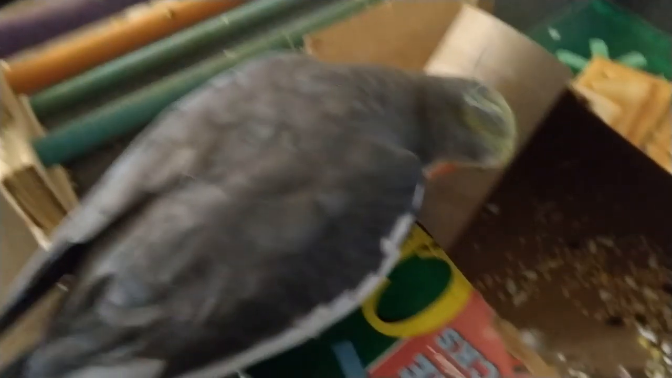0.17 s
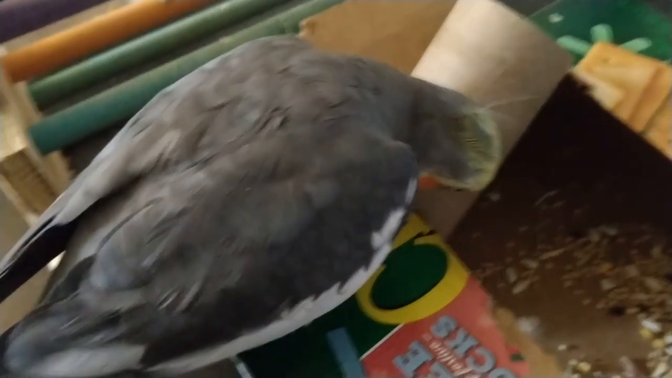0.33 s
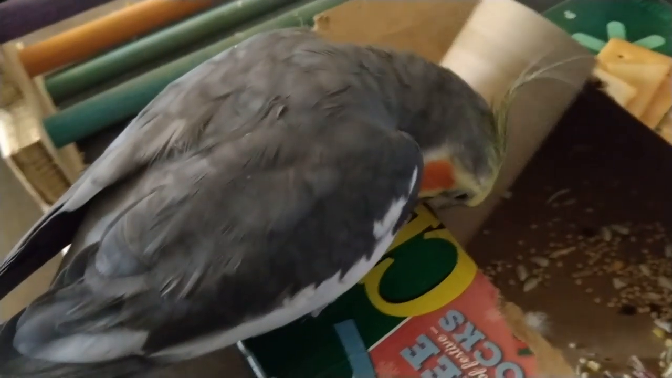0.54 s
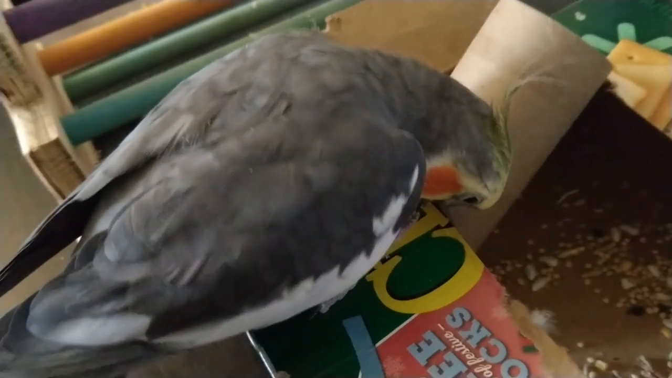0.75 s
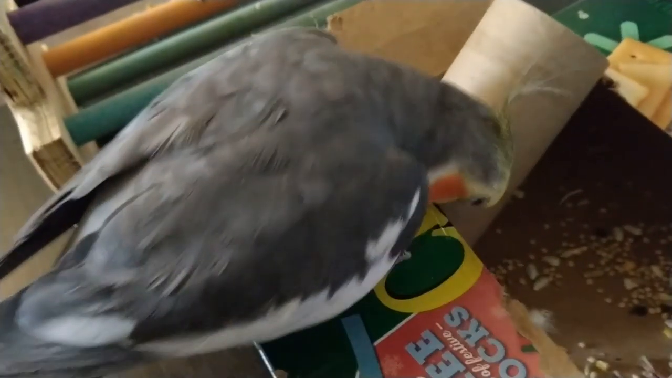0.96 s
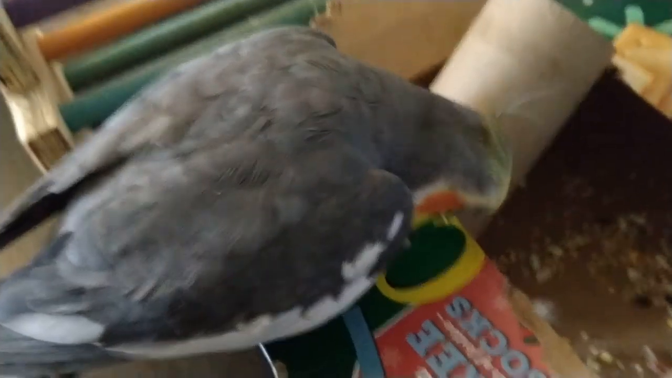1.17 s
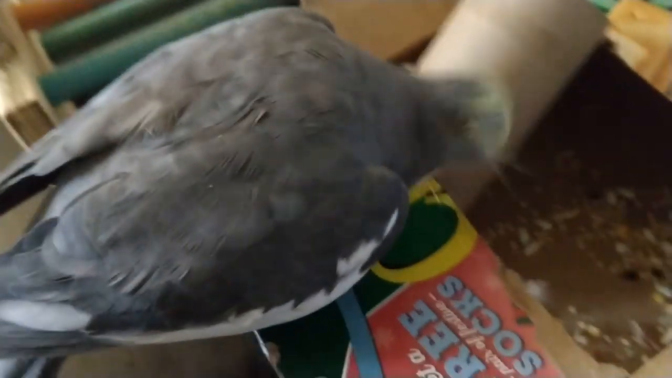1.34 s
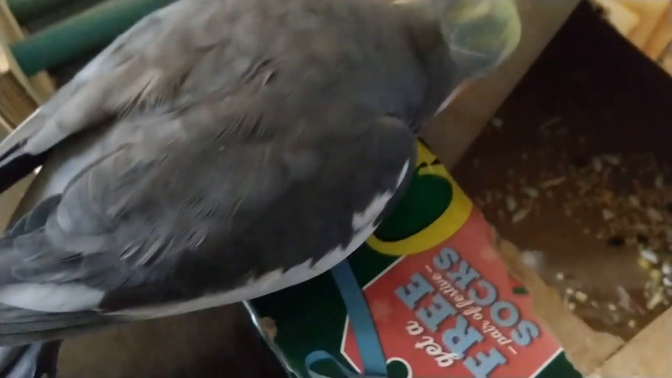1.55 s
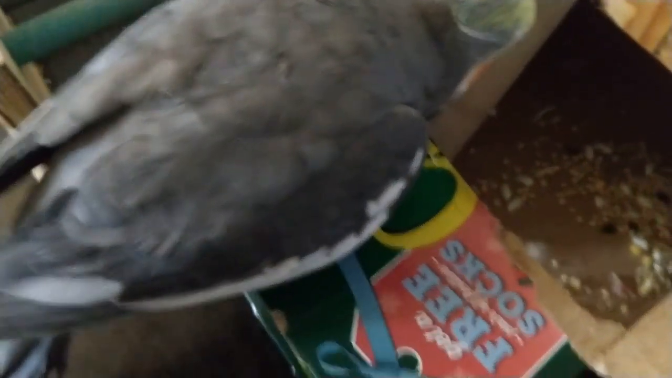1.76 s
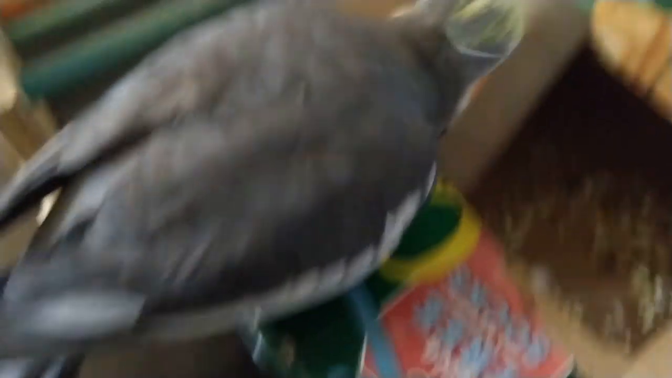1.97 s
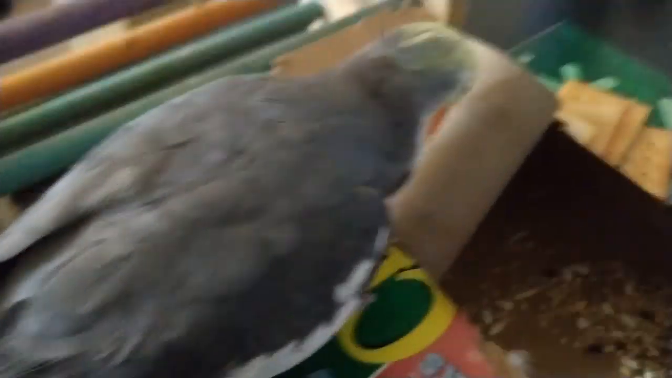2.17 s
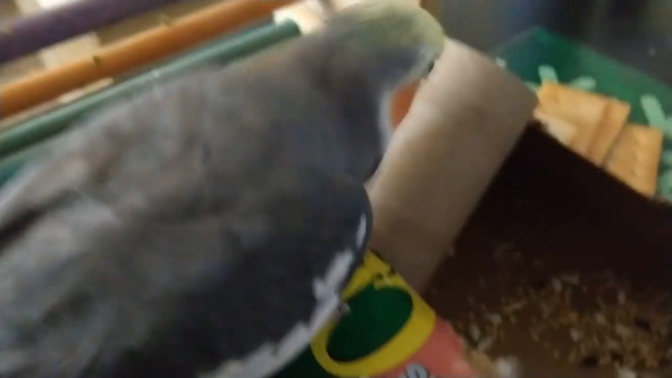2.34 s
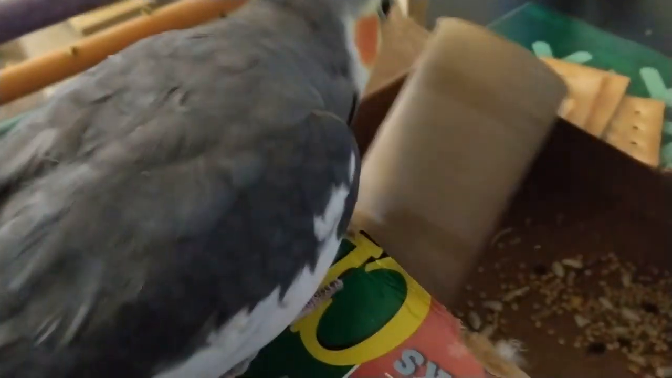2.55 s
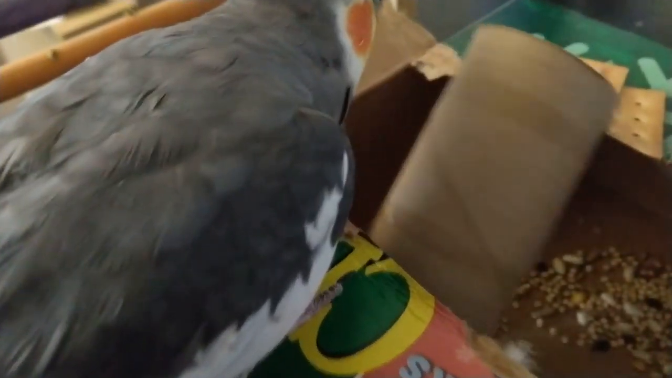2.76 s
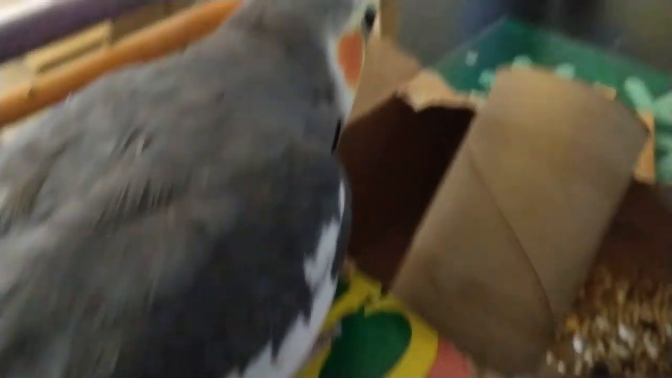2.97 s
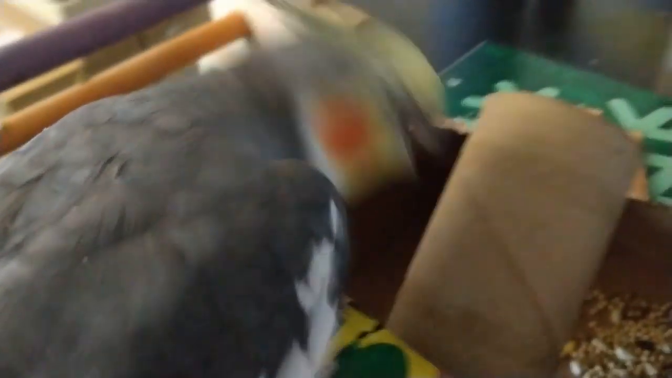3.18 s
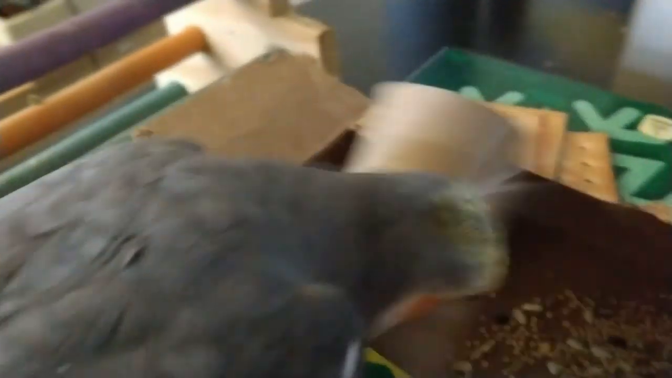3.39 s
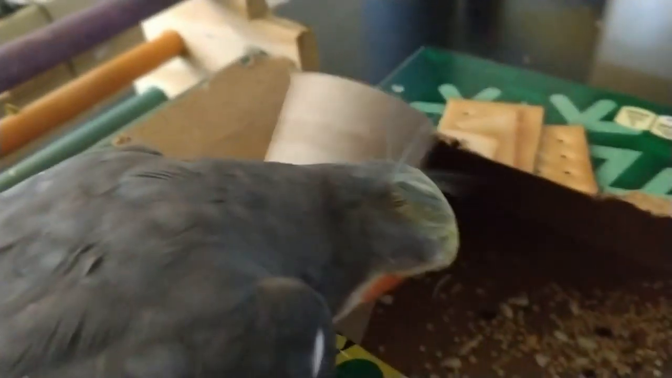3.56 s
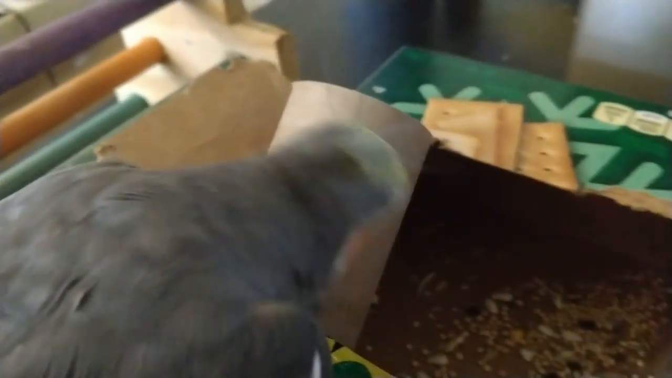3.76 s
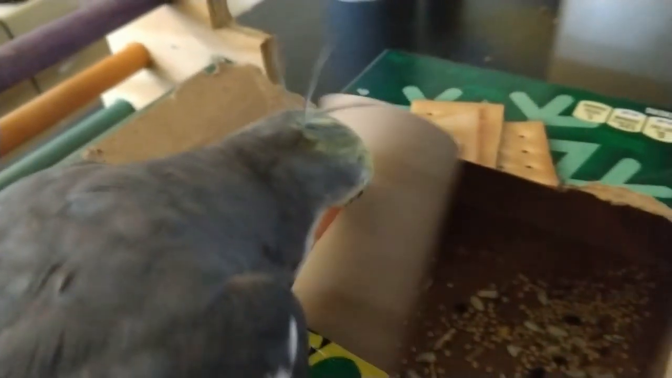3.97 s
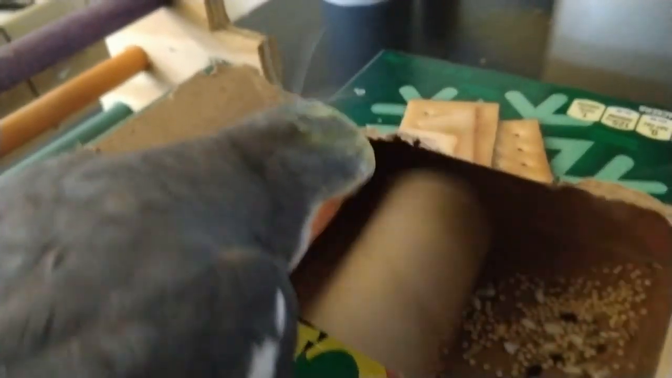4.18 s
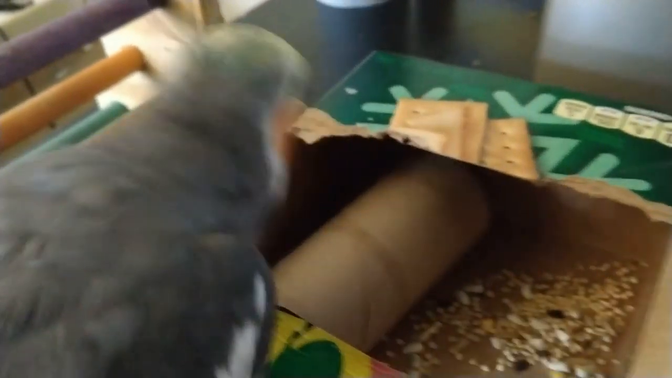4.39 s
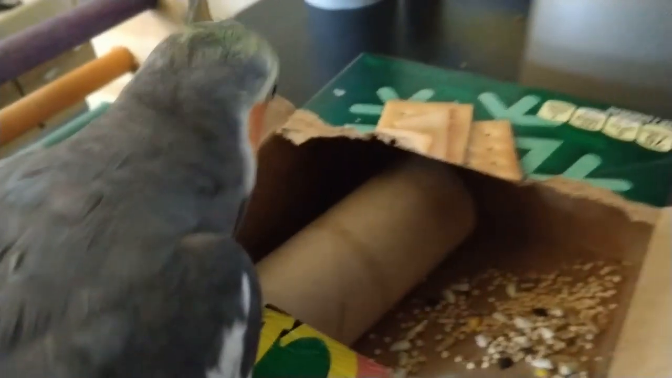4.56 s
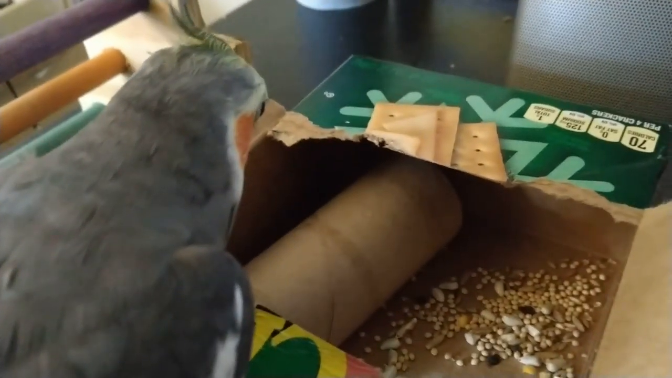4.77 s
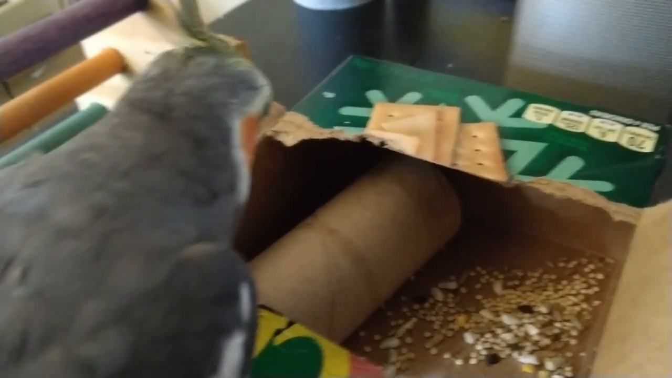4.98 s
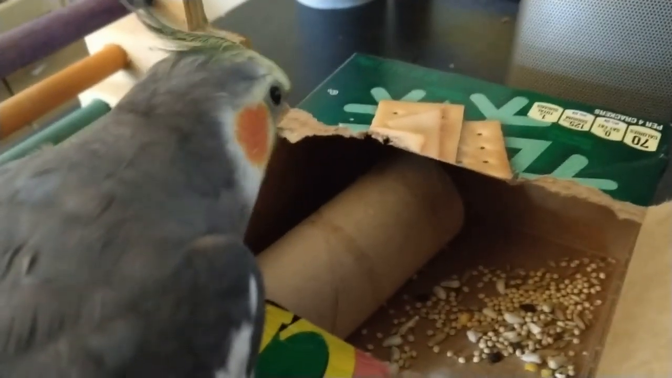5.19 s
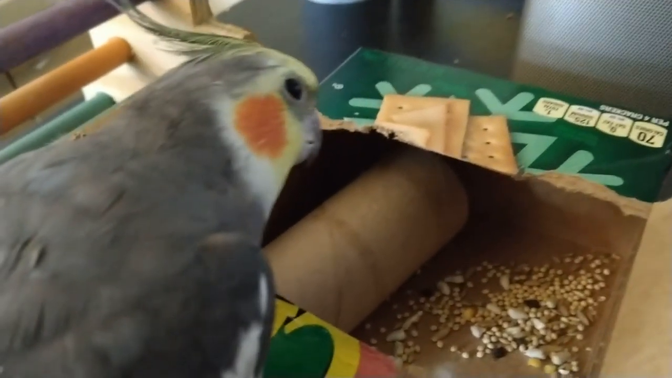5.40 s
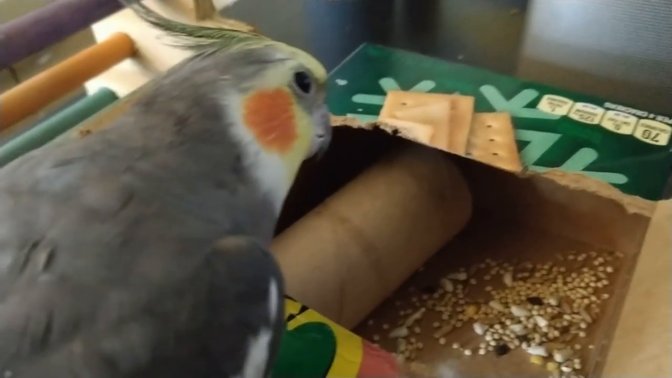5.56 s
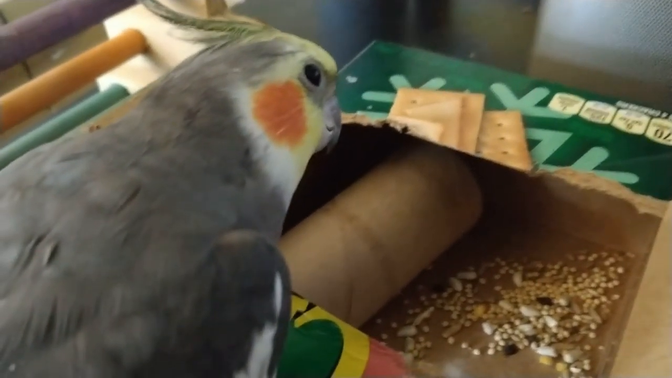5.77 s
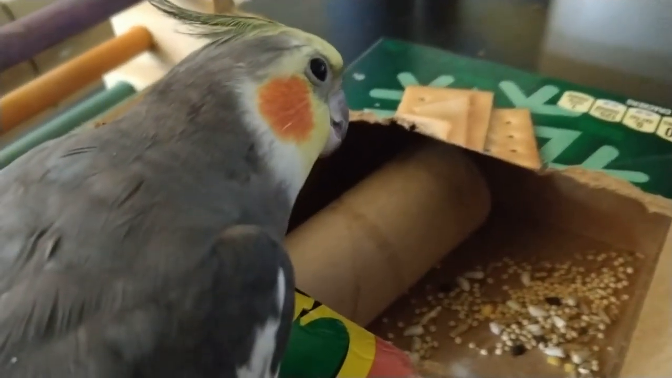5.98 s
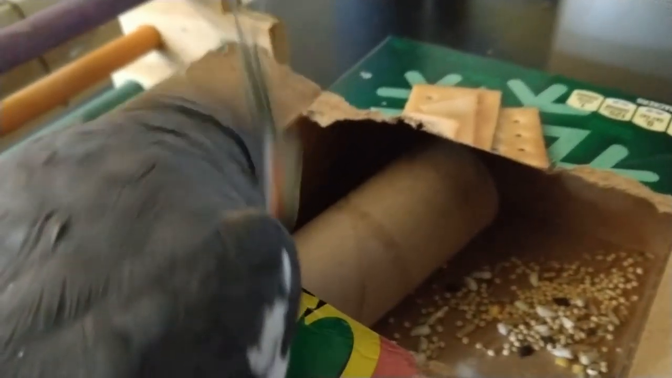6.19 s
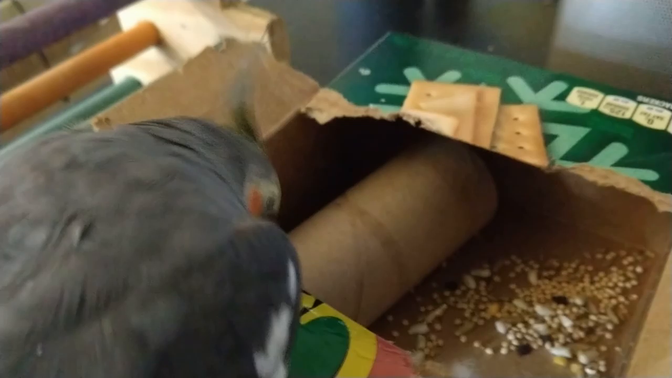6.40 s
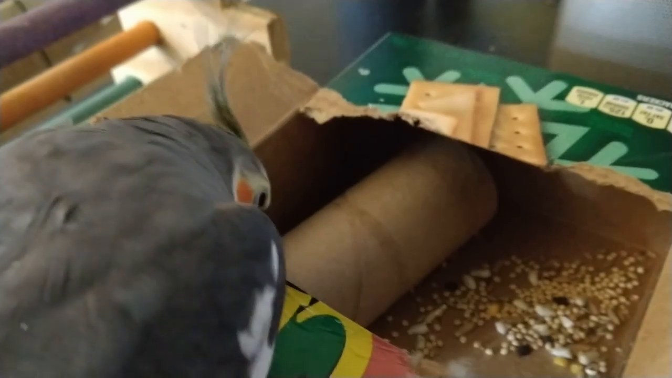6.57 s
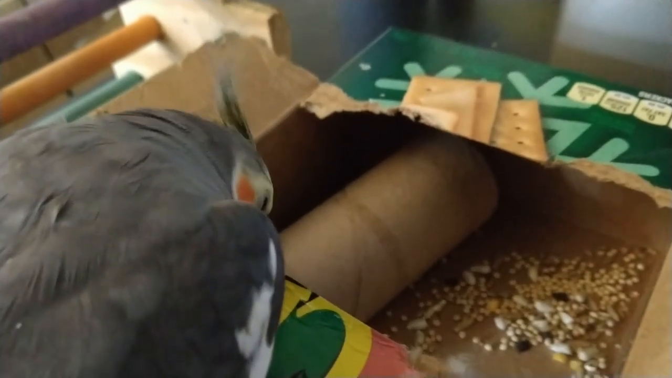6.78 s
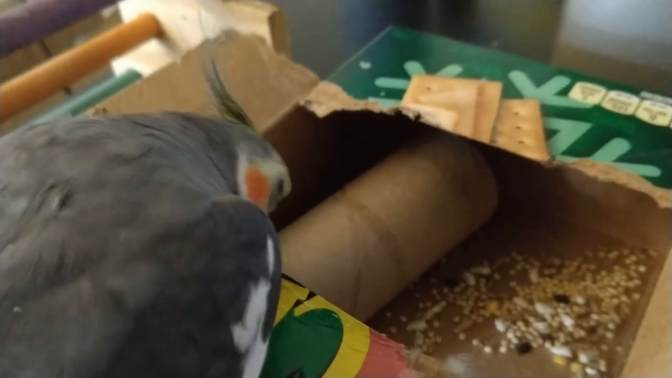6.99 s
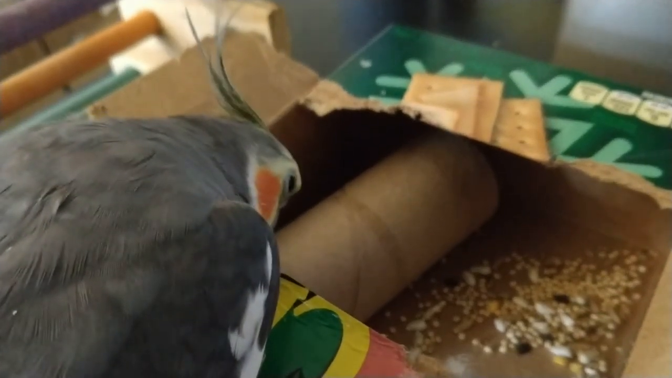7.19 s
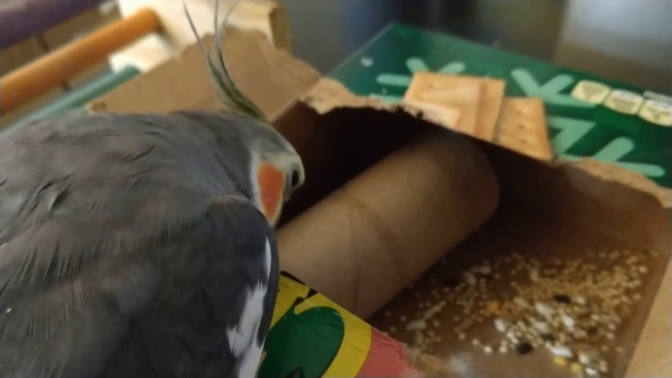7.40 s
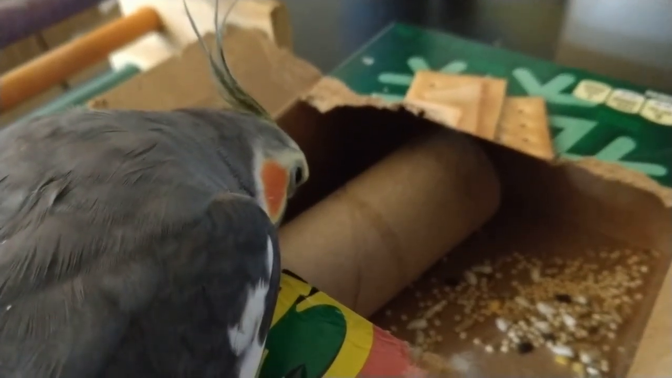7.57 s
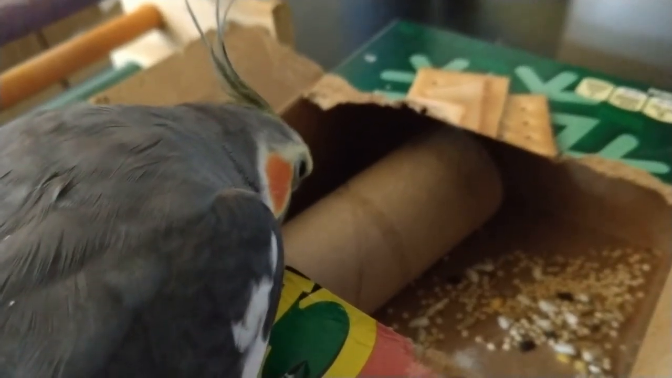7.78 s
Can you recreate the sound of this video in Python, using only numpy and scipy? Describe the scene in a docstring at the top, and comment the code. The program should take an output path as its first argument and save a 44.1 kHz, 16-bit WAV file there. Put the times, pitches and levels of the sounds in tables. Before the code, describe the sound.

Close up in a small furnished room, a cockatiel works at a cardboard tube inside a box. A sharp dry crack comes early, then light taps, two heavier hollow knocks, a flurry of bumps, and the tube dropping and bouncing. After a quiet pause, a few more bites and knocks follow. Faint appliance hum and air lie beneath, heard through a hand-held phone in wide stereo.

```python
"""Room air, a faint appliance hum and a scratch over card come first, then knocks on a cardboard tube.
A cockatiel pecks, bites and shoves the tube in a cardboard box, close to a hand-held phone indoors.
Knocks are decaying sines, the box adds a boom; snaps, rustle and hiss are shaped noise, cracks fast sweeps.
The phone widens its two microphone ports by subtracting a delayed copy of each from the other."""
import sys
import numpy as np
from scipy import signal
from scipy.fft import rfft, irfft, next_fast_len
from scipy.io import wavfile
from scipy.ndimage import uniform_filter1d, map_coordinates

SR = 44100
rng = np.random.default_rng(int(sys.argv[2]) if len(sys.argv) > 2 else 0)


def store_pcm(level_fs):
    """Save levels as 16-bit WAV."""
    pcm = np.round(np.clip(level_fs, -1, 1) * 32767).astype(np.int16)
    wavfile.write(sys.argv[1], SR, np.atleast_2d(pcm).T)


N = 345744  # length in samples


def amp(db):
    """Turns a level in dB into a gain."""
    return 10 ** (np.asarray(db) / 20)


def unit(x):
    """Scales x to an rms of 1."""
    return x / np.sqrt(np.mean(x ** 2) + 1e-20)


def along(points, hz):
    """Reads a curve of (Hz, value) points, joined on a log frequency axis."""
    point_hz, values = np.transpose(points)
    return np.interp(np.log(hz + 1), np.log(point_hz + 1), values)


def filtered(x, response):
    """Filters x by multiplying its spectrum with a function of frequency."""
    size = next_fast_len(N + 8192)  # spare room so that the end does not wrap to the start
    return irfft(rfft(x, size) * response(np.fft.rfftfreq(size, 1 / SR)), size)[..., :N]


def wobble(rate):
    """A smooth random curve with rate random knots a second."""
    knots = rng.standard_normal(int(N * rate / SR) + 4)
    return map_coordinates(knots, [np.arange(N) * rate / SR])


def add(track, start, sound):
    """Mixes a sound into a track from a start time in seconds."""
    part = track[..., round(start * SR):][..., :sound.shape[-1]]
    part += sound[..., :part.shape[-1]]


def lean_gain(lean_db):
    """Splits a left-over-right level in dB evenly between the two ports."""
    return amp(lean_db * np.array([[.5], [-.5]]))


# Colour of the room and microphone noise. Each row: frequency in Hz, relative level in dB.
AIR_COLOUR = [(30, -30), (55, 3.5), (150, 2), (300, -4.5), (700, -15), (1300, -22), (2200, -28),
              (3500, -33), (6000, -40), (10000, -37), (15000, -33)]
# How alike the noise is at the two ports. Each row: frequency in Hz, likeness (1 = the same).
AIR_ALIKENESS = [(60, 0.078), (300, 0.76), (1000, 0.42), (3000, 0.02)]
# Balance of the noise. Each row: frequency in Hz, left port over right in dB.
AIR_BALANCE = [(100, 1), (1000, -5), (4000, -2.5), (8000, 6), (15000, 1)]
# Appliance lines. Each row: frequency in Hz, middle level in dB before the left-right balance,
# speed of the waver in Hz (half the level knots a second; a quarter of it scales the pitch wander).
HUM_LINES = [(98.7, -59, 20), (135, -59.5, 5), (187.5, -68, 20), (221, -63.5, 8)]
# Level of a thin whine. Each row: time in seconds, middle level in dB before the left-right balance.
WHINE_LEVEL = [(0, -72), (1.5, -78.5), (3, -77.5), (4.5, -71), (6, -76), (7.8, -74)]
WHINE_HZ = 984
AIR_DB, AIR_SWELL_DB, TONE_SWELL_DB = -55.0, .7, 2.2  # middle level of the air; sizes of random swells


def background():
    """Air is noise partly shared by the ports; the hum and whine are sines that waver in level and pitch."""
    def mid_side(hz):
        angle = np.arccos(along(AIR_ALIKENESS, hz)) / 2
        return amp(along(AIR_COLOUR, hz)) * [np.cos(angle), np.sin(angle)]

    mid, side = filtered(rng.standard_normal((2, N)), mid_side)
    pair = filtered(np.array([mid + side, mid - side]), lambda hz: lean_gain(along(AIR_BALANCE, hz)))
    air = amp(AIR_DB + AIR_SWELL_DB * wobble(3.0)) * unit(pair)
    t = np.arange(N) / SR
    hum = np.zeros(N)
    for hz, db, waver in HUM_LINES:
        turns = hz * t + np.cumsum(wobble(waver)) * waver / 4 / SR
        hum += amp(db + TONE_SWELL_DB * wobble(waver * 2)) * np.sin(2 * np.pi * turns)
    whine_db = np.interp(t, *np.transpose(WHINE_LEVEL)) + TONE_SWELL_DB * wobble(7.5)
    whine_turns = WHINE_HZ * t + np.cumsum(wobble(3.3)) / SR
    whine = amp(whine_db) * np.sin(2 * np.pi * whine_turns)
    return air + (hum + whine) * lean_gain(4)


def hiss():
    """Faint steady hiss of the electronics: noise with its bass taken away."""
    return amp(-74.5) * filtered(rng.standard_normal((2, N)), lambda hz: hz / (3000 + hz))


# Colour of the papery upper part of snaps and rustle. Each row: frequency in Hz, gain in dB.
PAPERY_COLOUR = [(3500, -6.5), (5000, -1.5), (8000, 2), (11000, 2), (14000, 4), (15500, -0.5)]
# Colour of their duller lower part. Each row: frequency in Hz, gain in dB.
BOXY_COLOUR = [(60, -34), (300, -20), (700, 7.5), (1500, 1), (2500, 6.5), (3500, -1.5), (4500, -7),
               (6000, -36)]


def two_parts(upper, lower):
    """Colours raw crackle: a papery top and a duller part from the card."""
    papery = filtered(upper, lambda hz: amp(along(PAPERY_COLOUR, hz)))
    return papery + filtered(lower, lambda hz: amp(along(BOXY_COLOUR, hz)))


# Beak and feathers drag over the card. Each row: start in seconds, length in seconds until it has
# faded by 14 dB, level in dB before fading and colouring, lower part against the upper in dB.
DRAGS = [(0, 0.035, -54, 2), (0.041, 0.068, -62, -5), (0.22, 0.06, -67.5, -21), (0.379, 0.074, -64, 0),
         (0.548, 0.36, -78, 10.5), (0.997, 0.019, -59, 5.5), (1.144, 0.068, -66.5, 12),
         (1.326, 0.025, -76, 26), (1.467, 0.11, -62.5, -0.5), (1.891, 0.049, -62, -8),
         (2.196, 0.08, -70, -10), (2.574, 0.015, -47.5, -16), (2.614, 0.15, -59.5, -10),
         (2.948, 0.051, -67.5, -18), (2.995, 0.15, -66.5, -23), (3.196, 0.044, -66.5, -2),
         (3.394, 0.017, -48, 10), (3.421, 0.007, -47, -10), (3.43, 0.035, -51, -1),
         (3.446, 0.17, -58.5, -7), (3.63, 0.22, -64, -2), (3.743, 0.89, -77, -17), (4, 0.16, -68.5, 1),
         (4.22, 0.05, -59, -24), (4.267, 0.1, -56.5, -37), (4.3, 0.014, -53, -20), (4.312, 0.035, -43, -3),
         (4.35, 0.033, -66, -4), (4.357, 0.017, -56, -25), (4.373, 0.055, -51, -1), (4.45, 0.046, -64, -6),
         (4.617, 0.033, -65.5, -3), (6.406, 0.024, -51.5, 13.5), (6.439, 0.054, -58, 4),
         (6.496, 0.15, -67.5, 2), (6.708, 0.023, -53, 2), (6.746, 0.048, -62.5, 3), (6.884, 0.076, -64, 11),
         (7.081, 0.043, -68, 10)]
RISE_SHARE = 0.17  # a drag's rise as a share of its length
# Every blow rattles the card and seeds: level against the blow and lower part against the upper, in dB.
RATTLE_DB, RATTLE_LOWER_DB = -35, 5
# A rattle's rise and least length in seconds; seconds of length added per second of contact.
RATTLE_RISE_S, RATTLE_S, RATTLE_PER_CONTACT = 0.00019, 0.032, 2.5


def rustle(alike=0.36):
    """Uneven noise grains and scattered ticks under each drag and blow, partly different at the ports."""
    t = np.arange(N) / SR
    ticks = (rng.random(N) < 110 / SR) * rng.exponential(1, N)  # about 110 a second
    ticks = uniform_filter1d(ticks, size=50) * 50  # each tick lasts 50 samples
    unevenness = amp(1.6 * wobble(400) + 2.2 * wobble(90))
    grains = rng.standard_normal((3, N)) * unevenness * (1 + .7 * ticks)
    pair = unit(np.sqrt(alike) * grains[0] + np.sqrt(1 - alike) * grains[1:])
    strokes = [(start, RISE_SHARE * length, length, db, lower_db) for start, length, db, lower_db in DRAGS]
    for start, db, *_, contact in BLOWS + DROP_BLOWS:
        length = RATTLE_S + RATTLE_PER_CONTACT * contact
        strokes.append((start, RATTLE_RISE_S, length, db + RATTLE_DB, RATTLE_LOWER_DB))
    upper, lower = np.zeros(N), np.zeros(N)
    for start, rise, length, db, lower_db in strokes:
        u = t[:round(length * 2 * SR)]
        fade_db = 12 * (u / length) ** 2 + 2 * (u / length) ** 4
        stroke = np.clip(u / rise, 0, 1) * amp(db - fade_db)
        add(upper, start, stroke)
        add(lower, start, amp(lower_db) * stroke)
    return two_parts(pair * upper, pair * lower)


# Blows on the tube. Each row: start in seconds, peak in dB without the boom and before port colouring,
# box boom against the blow in dB, tilt towards high modes in dB per octave,
# fall away from 700 Hz in dB per octave squared, contact length in seconds (at least 1 ms is used).
BLOWS = [(0.058, -36.5, 7.5, -25, 13, 0.0034), (0.393, -54, -18, -5, 11, 0.0015),
         (0.4154, -51.5, 5, 1, 4.5, 0.0078), (0.566, -54.5, -4, 10, 0.5, 0.0033),
         (0.594, -50, -9, 5, 1, .004), (0.631, -54, 3, 11, 6, 0.0044), (0.746, -57, -29, 14, 5, 0.009),
         (0.9405, -49.5, 2, 7, 5, 0.0061), (0.9614, -28.5, -18, 7.5, 3.5, 0.0031),
         (1.0168, -30, -18, 7, 5.5, 0.0063), (1.0205, -38, -25, -6, 3, 0.0043),
         (1.187, -44, 0.5, -1, 2.5, 0.011), (1.263, -41.5, -13, 10, 5, 0.0068),
         (1.306, -51, -12, 4, 5, 0.0095), (1.329, -44.5, -27, 10.5, 8.5, 0.014),
         (1.4746, -37, -6, -4, 2.5, 0.0044), (1.481, -47.5, 0, -2, 5, 0.0046),
         (2.127, -25, -12, -1.5, -0.5, 0.0039), (2.132, -16.5, -18, -8.5, 3, 0.0065),
         (2.147, -31, -20, 13, 14, 0.016), (2.526, -24.5, -11, 8.5, 7, 0.0035),
         (2.531, -16, -18, -8.5, 5.5, 0.0052), (2.544, -25, -17, -5, 3.5, 0.01),
         (2.567, -38, -20, -6, 4, 0.011), (2.595, -47, -16, -12, 11, 0.0056),
         (3.179, -40, -23, 20.5, 7.5, 0.002), (3.215, -42, -23, 22, 8.5, 0.0044),
         (3.372, -23, -10.5, 2, 2, 0.007), (3.3992, -24, -8, -12, 7, 0.0023),
         (3.402, -17.5, -13, 0.5, 8.5, 0.006), (3.4087, -15, -16, -4, 6, 0.0078),
         (3.415, -36, -25, -16, 8, 0.005), (3.4395, -34, -32, 2, 0.5, 0.029),
         (3.4495, -30.5, -27, -19, 14, 0.012), (3.473, -37.5, -27, 7, 2, 0.0061),
         (3.523, -33, -34, -7, 14, 0.0028), (3.686, -29, 4, 0, 8.5, 0.0045),
         (3.692, -30.5, -14, -14.5, 7, 0.016), (3.729, -36, -8, -10, 2.5, 0.008),
         (4.3168, -29, 0, -5, 0, 0.018), (6.3649, -19.5, -12.5, 0.5, 3.5, 0.0036),
         (6.372, -35.5, -20, 0.5, -3, 0.0024), (6.377, -39, -33, -7, 10, 0.003),
         (6.394, -41, -14, 0, -5, 0.0046), (6.423, -30, -10, 7, 2.5, 0.0025),
         (6.46, -35, -25, 11, 0, 0.0017), (6.478, -39.5, -22, 7, 1, 0.0024),
         (6.531, -45, -6, 7.5, 8, 0.0023), (6.676, -20.5, -32, 5, 2.5, 0.0039),
         (6.7075, -34.5, -37, 10, 3, 0.0063), (6.714, -29, -37, 16, 2.5, 0.0046),
         (6.888, -48, -8, -16, 5, 0.0041), (6.968, -34, -4, 2, 1.5, 0.004)]
# The tube bumps the box floor, then drops and bounces. Each row: the same columns.
DROP_BLOWS = [(4.154, -25, -17, 4.5, 3.4, 0.0079), (4.1915, -30, -11, 1.5, 2.6, 0.022),
              (4.221, -35.5, -18, -3, 3, 0.011), (4.236, -32.5, -26, 11, 1.5, 0.0064),
              (4.245, -31.5, -24, 3, 1.5, 0.0073), (4.3348, -15, -15.5, -4, 1.2, 0.004),
              (4.34, -43, -4, -1, 3, 0.0039), (4.357, -37.5, -3, -12, 4.4, 0.0093),
              (4.3874, -21.5, -13, -17, 7.3, 0.0053), (4.4235, -25.5, -10, -3, 2.6, 0.005),
              (4.449, -32, -17, -9, 1.7, 0.01), (4.467, -37, -13, -6, 1.5, 0.031),
              (4.4887, -31, 10, -5, 1.5, 0.01), (4.626, -43, 11.5, -4, 3, 0.01),
              (4.648, -46.5, 7, -2, 2.7, 0.012)]
# Modes (ringing tones) of the tube. Each row: frequency in Hz, relative level in dB,
# time in seconds for free ringing to fall by 60 dB.
TUBE_MODES = [(255, 4.5, 0.25), (430.3, 0, 0.29), (488.7, -12, 0.12), (527.4, 1.5, 0.2), (621, -3, 0.12),
              (691, 4.5, 0.092), (848, -0.5, 0.16), (905, -2, 0.05), (1042, -1, 0.067), (1239, -7.5, 0.14),
              (1507, -6, 0.1), (1676, -1.5, 0.024), (1904, -4.5, 0.081), (3050, -11, 0.015)]
# Modes of the box floor. Each row: the same columns.
FLOOR_MODES = [(230, -7.5, 0.098), (409, -2.5, 0.43), (481, 2.5, 0.05), (563.4, -0.5, 0.22),
               (666, -16, 0.065), (869, -3.5, 0.047), (957, -7.5, 0.059), (1077, -6.5, .07),
               (1248, -12.5, 0.083), (1490, -24, 0.046)]
# The box's boom: frequency in Hz, time in seconds to fall by 60 dB.
BOX_BOOM = (178, 0.2)
FREE_DB = -16.5  # free ringing against the forced shake
CONTACT_EDGE = 2.7  # how abruptly a contact ends
FLUTTER_DB, FLUTTER_S = 5.5, 0.0107  # random rise and fall of the ringing level: depth, pace


def knocks(blows, modes):
    """Each blow shakes the modes during contact, then lets them ring freely; the box booms along."""
    out, t = np.zeros(N), np.arange(SR // 3) / SR
    hz, level_db, t60 = np.transpose(modes)[:, :, None]
    boom_hz, boom_t60 = BOX_BOOM
    octaves = np.log2(hz / 700)
    for start, db, box_db, tilt_db, focus_db, contact in blows:
        # each blow has its own balance of modes, with a little chance
        spot_db = tilt_db * octaves - focus_db * octaves ** 2 + rng.normal(0, 1.6, hz.shape)
        # random pitch wander roughens the ringing
        wander = np.cumsum(rng.normal(0, 0.017, (len(modes), len(t))), axis=1)
        phase = 2 * np.pi * (hz * t + rng.uniform(0, 0.26, hz.shape)) + wander
        knots = rng.standard_normal((len(modes) + 1, 100))
        flutter_db = FLUTTER_DB * np.array([np.interp(t / FLUTTER_S, np.arange(len(k)), k) for k in knots])
        forced = np.exp(-(t / max(contact, 1e-3)) ** CONTACT_EDGE)
        free = amp(FREE_DB + flutter_db[1:] - 60 * t / t60)
        body = np.sum(amp(level_db + spot_db) * (forced + free) * np.sin(phase), axis=0)
        body *= 1 - np.exp(-t / 0.0011)  # soft onset
        boom = amp(box_db + flutter_db[0] / 3 - 60 * t / boom_t60)
        boom *= np.sin(2 * np.pi * boom_hz * t + wander[0]) * (1 - np.exp(-t / 0.005))
        add(out, start, amp(db) * (body / np.abs(body).max() + boom))
    return np.array([out, out])


def room(x, t60=0.34):
    """A small furnished room answers with a dull tail of fading noise, different at each port."""
    t = np.arange(SR // 3) / SR
    tail = signal.lfilter([1], [1, -.7], rng.standard_normal((2, len(t)))) * amp(-60 * t / t60)
    delayed = np.pad(x, ((0, 0), (150, 0)))  # the answer starts 150 samples late
    return signal.fftconvolve(delayed, tail / np.linalg.norm(tail[0]), axes=1)[:, :N]


# Dips of the background. Each row: start in seconds, depth in dB, pace of the return in seconds.
BACKGROUND_DIPS = [(0.213, 13.5, 1.06), (3.745, 7.5, 0.22)]


def sink():
    """Gain of background and room tail: a sudden drop at each listed time, then a slow return."""
    t = np.arange(N) / SR
    dip_db = sum((t > start) * db * np.exp(-((t - start) / back) ** 2) for start, db, back in BACKGROUND_DIPS)
    return amp(1.25 - dip_db)


# Fibres snap at the beak. Each row: start in seconds, level in dB before shaping and colouring,
# lower part in dB before a fixed boost, left port over right in dB before port colouring.
FIBRE_SNAPS = [(0.2134, -35.5, -4, -12.5), (0.9608, -30.5, -3, 3), (.978, -51, 6, 3), (1.019, -56, 15, -2),
               (1.045, -72, 16, -4), (1.189, -52, -8, -3), (1.264, -63, 14, -1), (1.8978, -38.5, -4, -4),
               (2.295, -59, -5, -2), (2.528, -35, -3, 0.1), (2.755, -53, -41, 5), (2.827, -56, -20, 4),
               (3.1807, -52, -18, -3), (3.23, -51, -8, 6), (3.3444, -51, -11, 0.1), (3.3705, -36, 12, 2),
               (3.3738, -37.5, 2, -2), (3.382, -49, 7, -4), (3.425, -36.5, -17, -13), (3.437, -47, -6, 5),
               (3.441, -47, 0, 0.1), (3.5569, -51.5, 3.5, -3), (3.7433, -30, -7.5, -1),
               (4.096, -59, -21, 0.1), (4.1523, -36.5, -5, 0.1), (4.1925, -47, -17, 4),
               (4.238, -49, -22, -2), (4.2475, -37, -24, 1), (4.303, -51, -20, 2), (4.3171, -33.5, -5, -3),
               (4.326, -32, 0, 3), (4.3355, -29.5, -18, -2), (4.361, -52, -10, 0.1),
               (4.3874, -36.5, -22, 5), (4.4085, -44, -6, 0.1), (4.4218, -41, -2, -6),
               (4.4895, -42, -18, 4), (4.511, -57, -10, 2), (4.587, -56.5, -5, -5), (4.709, -51, -8, 0.1),
               (6.199, -56, -16, 6), (6.367, -44, 17, 2), (6.371, -52, -6, 2), (6.4235, -53, 0, 0.1),
               (6.462, -51, 2, 0.1), (6.6755, -31.5, 2.5, 2.5), (6.7077, -38, -9, 0.1),
               (6.966, -47.5, -2, 0.1), (7.219, -59, -16, 4)]
LOWER_BOOST_DB = 3.5
PUSH_DB, PUSH_S = -16, 0.0001  # one-way shove of the card under each snap: level, decay time


def snaps():
    """Each snap is a noise burst of about a millisecond with a weak rattle after it."""
    upper, lower, t = np.zeros((2, N)), np.zeros((2, N)), np.arange(SR // 50) / SR
    shape = (1 - np.exp(-t / 0.00022)) * (1.5 * np.exp(-t / 0.00035) + 0.58 * np.exp(-t / 0.0024))
    for start, db, lower_db, lean_db in FIBRE_SNAPS:
        gain = amp(db) * lean_gain(lean_db)
        shared = np.sign(rng.standard_normal(len(t)))
        burst = gain * shape * (shared + 0.83 * rng.standard_normal((2, len(t))))
        push = amp(PUSH_DB) * gain * np.exp(-t / PUSH_S)
        add(upper, start, burst)
        add(lower, start, amp(lower_db + LOWER_BOOST_DB) * (1.09 * burst + push))
    return two_parts(upper, lower)


# The beak slips off with one dry crack. Each row: start in seconds, sweep level in dB before colouring,
# left port over right in dB before port colouring, level of the beak's ring in dB.
BEAK_CRACKS = [(0.214, -21, 4.5, -39), (1.899, -37.5, -4, -41), (3.744, -57, -1.5, -29)]
# The beak's short ring. Each row: frequency in Hz, relative level in dB, seconds to fall by 60 dB.
BEAK_MODES = [(1660, -3.5, 0.0064), (3350, -4, 0.0092), (7050, -21, .01)]
# Colour of the sweep. Each row: frequency in Hz, gain in dB.
CRACK_COLOUR = [(100, 1), (400, 5.5), (1200, 11), (3500, 5.5), (8000, 3.5), (15000, 4)]
CRACK_S, CRACK_TOP_HZ = .0006, 16000  # length of the sweep; where it starts


def cracks():
    """Each sweep falls to the bass in under a millisecond; the horn of the beak rings briefly."""
    sweeps, rings, t = np.zeros((2, N)), np.zeros((2, N)), np.arange(SR // 50) / SR
    turns = CRACK_TOP_HZ * (t - t * t / (2 * CRACK_S))
    sweep = (t < CRACK_S) * np.cos(2 * np.pi * turns)
    ring = sum(amp(db - 60 * t / t60) * np.sin(2 * np.pi * hz * t) for hz, db, t60 in BEAK_MODES)
    for start, db, lean_db, ring_db in BEAK_CRACKS:
        add(sweeps, start, amp(db) * lean_gain(lean_db) * sweep)
        add(rings, start, amp(ring_db) * lean_gain(lean_db) * ring)
    return filtered(sweeps, lambda hz: amp(along(CRACK_COLOUR, hz))) + rings


# Low rumble while the phone is moved. Each row: time in seconds, middle level in dB.
RUMBLE_LEVEL = [(1.7, -92), (2.2, -47.5), (2.7, -63), (3.2, -54.5), (3.7, -61), (7.8, -63)]


def rumble():
    """Bass noise that swells and fades, unrelated at the two ports."""
    noise = filtered(rng.standard_normal((2, N)), lambda hz: hz / (50 + hz) / (1 + (hz / 110) ** 3))
    level_db = np.interp(np.arange(N) / SR, *np.transpose(RUMBLE_LEVEL))
    return amp(level_db + 0.47 * wobble(1.7)) * unit(noise)


# The hand bumps the phone. Each row: start in seconds, level in dB before fading and the split
# between the ports, frequency in Hz that the pitch settles to.
PHONE_BUMPS = [(2.433, -20, 119), (2.787, -21, 132.6)]


def bumps():
    """A low shake of the phone's shell: a fading sine whose pitch sags, opposite at the two ports."""
    out, t = np.zeros((2, N)), np.arange(SR // 10) / SR
    for start, db, hz in PHONE_BUMPS:
        turns = hz * (t + 0.0013 * (1 - np.exp(-t / 0.00072)))
        shake = (1 - np.exp(-t / 0.0004)) * amp(db - 60 * t / 0.033) * np.sin(2 * np.pi * turns)
        add(out, start, shake * np.array([[.6], [-.3]]))
    return out


# A narrow hiss swells and fades. Each row: time in seconds, level in dB.
SIZZLE_LEVEL = [(4.2, -100), (4.9, -97), (5.6, -88), (6.1, -98), (6.6, -100)]
SIZZLE_CENTRE_HZ, SIZZLE_WIDTH_HZ = 11300, 450  # width on each side of the centre


def sizzle():
    """Noise kept to a narrow bell-shaped band high in the treble."""
    bell = lambda hz: np.exp(-((hz - SIZZLE_CENTRE_HZ) / SIZZLE_WIDTH_HZ) ** 2)
    band = filtered(rng.standard_normal((2, N)), bell)
    return amp(np.interp(np.arange(N) / SR, *np.transpose(SIZZLE_LEVEL))) * unit(band)


# Left port against right for knocks. Each row: frequency in Hz, gain in dB.
KNOCK_COLOUR = [(300, 0), (600, 1), (1000, -4.5), (2500, -27), (4000, -12)]
# Left port against right for snaps, cracks and rustle. Each row: frequency in Hz, gain in dB.
CRACKLE_COLOUR = [(300, 0), (1000, -9), (2500, -19), (8000, 3.5), (10000, 3.5), (11500, 2.5), (13000, -0.5),
                  (15000, -2)]
KNOCK_LAG, CRACKLE_LAG = 5.9, 2.84  # how much later they reach the left port, in samples


def left_shade(points, lag):
    """Filter that colours and delays the left port and leaves the right alone."""
    return lambda hz: [amp(along(points, hz)) * np.exp(-2j * np.pi * hz * lag / SR), 1 + 0 * hz]


def scene():
    """Near sounds reach the left port coloured and a little later; the room answers them quietly."""
    thuds = knocks(BLOWS, TUBE_MODES) + knocks(DROP_BLOWS, FLOOR_MODES)
    crackle = cracks() + snaps() + rustle()
    near = filtered(thuds, left_shade(KNOCK_COLOUR, KNOCK_LAG))
    near += filtered(crackle, left_shade(CRACKLE_COLOUR, CRACKLE_LAG))
    far = sink() * (amp(-22.5) * room(thuds + crackle) + background())
    return near + bumps() + rumble() + hiss() + sizzle() + far


# Cavity of the left port: centre in Hz, width in Hz where the boost in dB is halved, boost in dB.
LEFT_CAVITY = (11330, 1660, 5.1)
# Cross-subtraction: right into left in dB, left into right in dB (both before a slight treble loss),
# delay in samples.
CROSS_FEED = (-0.58, -12.5, 18.38)
TOP_HZ = 16800  # nothing passes from here up


def record(dry):
    """Bass cut, port cavity, cross-subtraction that widens the image, treble shelf and band limit."""
    centre, width, boost_db = LEFT_CAVITY
    into_left_db, into_right_db, delay = CROSS_FEED
    bass_cut = lambda hz: (1j * hz / (45 + 1j * hz)) ** 2
    cavity = lambda hz: amp(boost_db / (1 + ((hz - centre) * 2 / width) ** 2))
    ports = filtered(dry, lambda hz: bass_cut(hz) * [cavity(hz), 1 + 0 * hz])
    # the swapped copy arrives late and loses 0.15 dB per kHz
    late = filtered(ports[::-1], lambda hz: amp(-.15 * hz / 1000) * np.exp(-2j * np.pi * hz * delay / SR))
    wide = ports - amp([[into_left_db], [into_right_db]]) * late
    shelf_db = lambda hz: -28 * np.clip((hz - 15470) / 100, 0, 1)
    return filtered(wide, lambda hz: amp(shelf_db(hz)) * (hz < TOP_HZ))


dry = scene()
out = record(dry)
store_pcm(out)
```